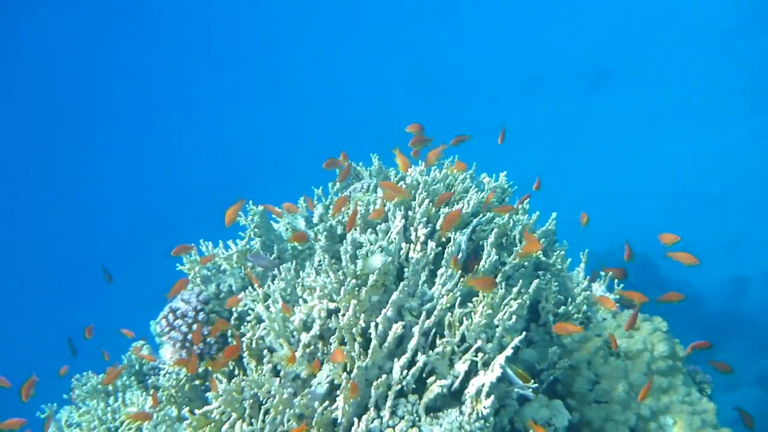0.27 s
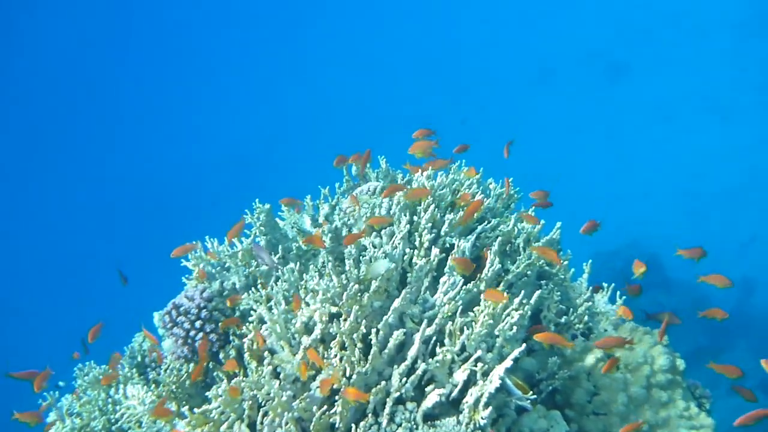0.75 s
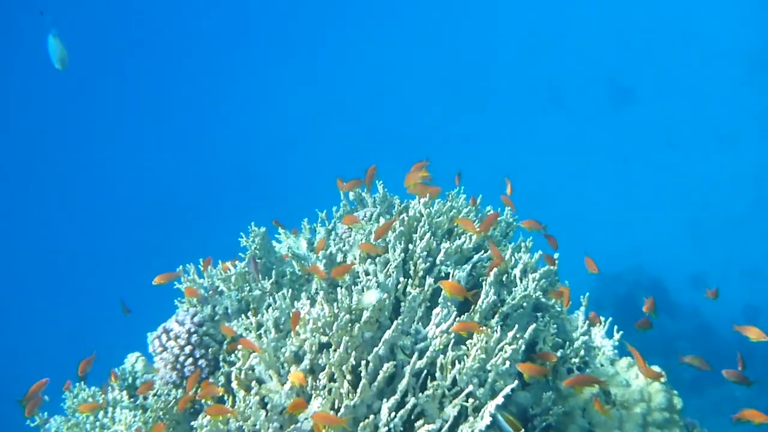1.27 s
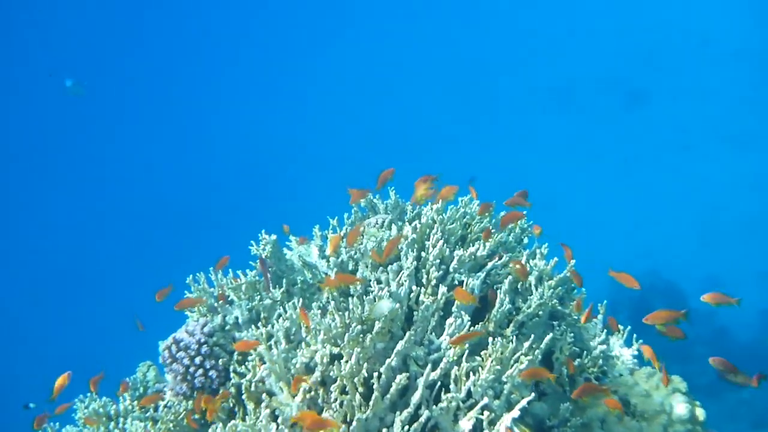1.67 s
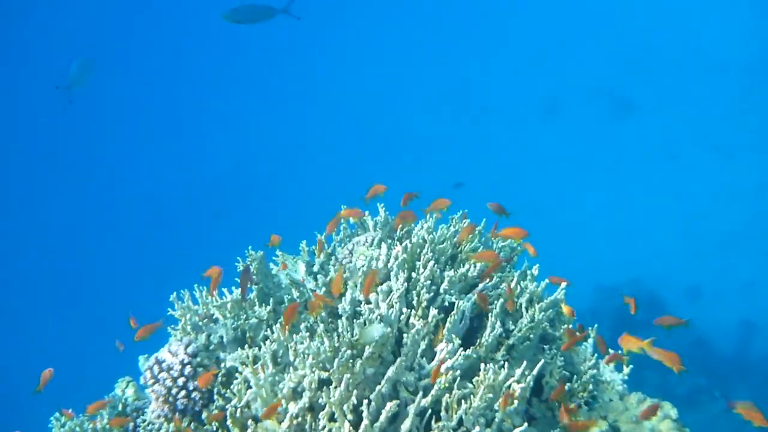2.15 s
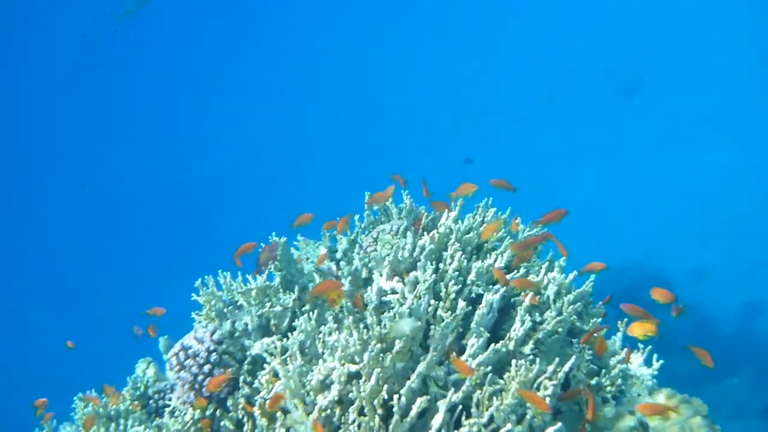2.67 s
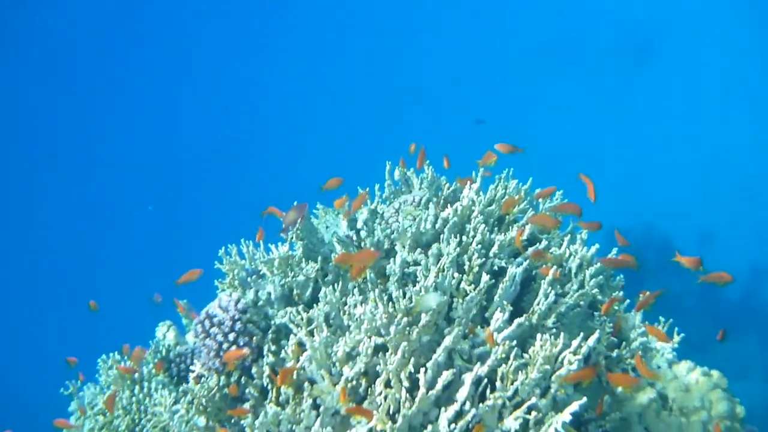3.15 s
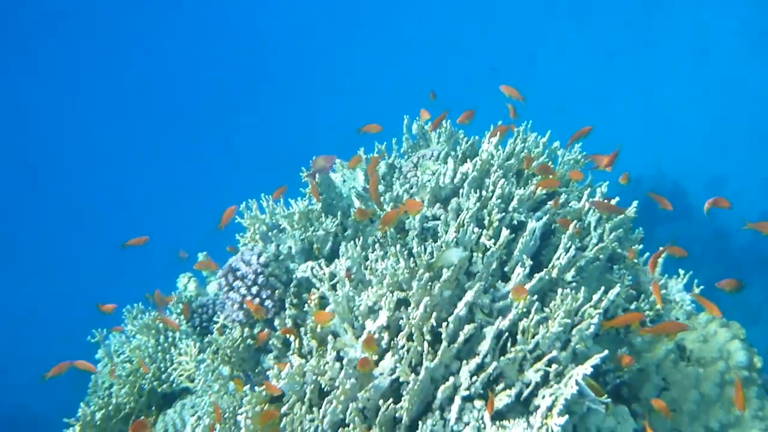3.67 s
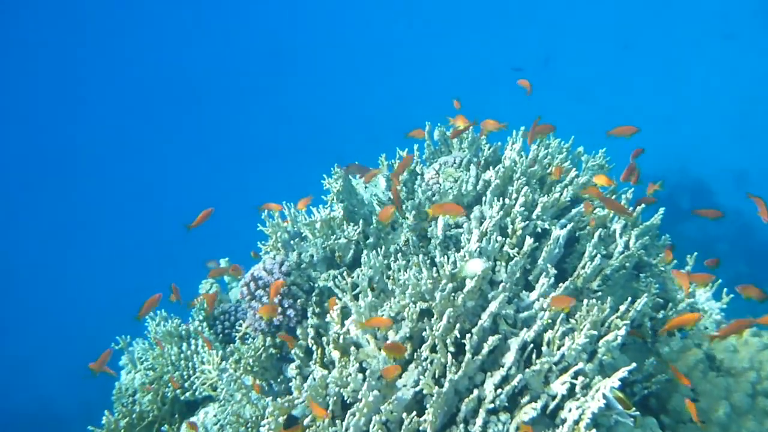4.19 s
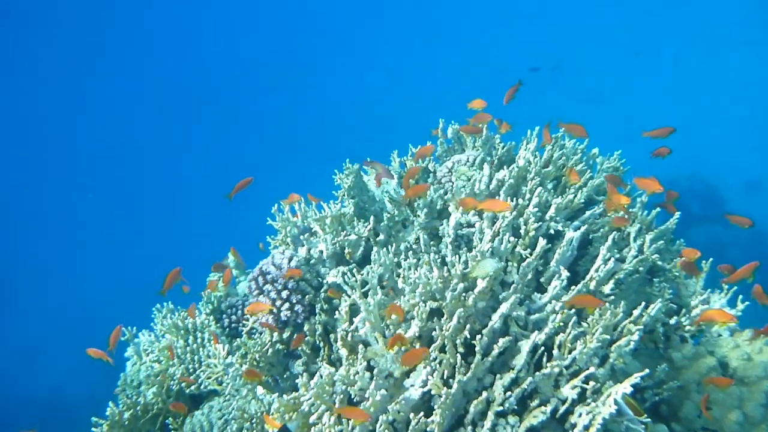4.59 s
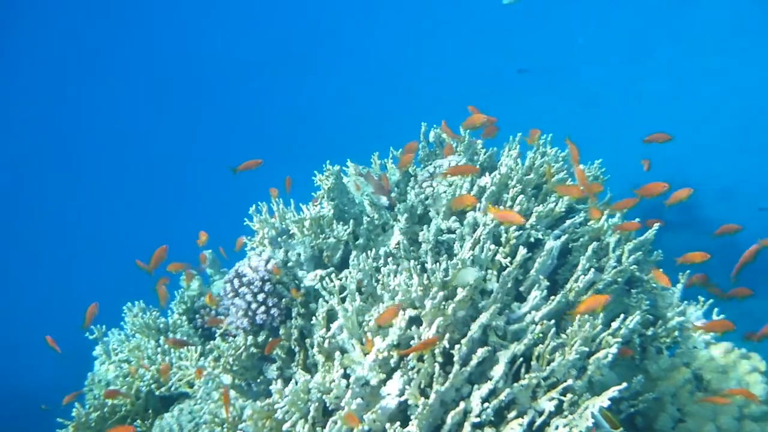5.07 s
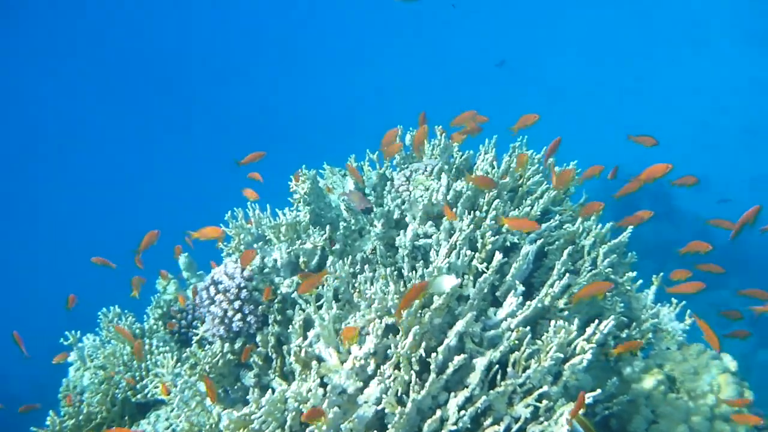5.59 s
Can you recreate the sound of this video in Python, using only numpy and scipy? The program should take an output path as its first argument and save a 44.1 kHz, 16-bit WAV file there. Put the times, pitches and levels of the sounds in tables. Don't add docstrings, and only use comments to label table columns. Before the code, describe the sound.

Underwater reef ambience: a fine frying crackle and soft hiss throughout, with random sharp pops at varying distances. Low fish knocks come in the first second and a half, then a heavy close snap, a slightly calmer stretch, another big snap, and denser popping with faint dull ringing later. The microphone sits in a camera housing whose walls ring briefly, colouring every click.

```python
import sys
import numpy as np
from scipy import signal
from scipy.io import wavfile
from scipy.ndimage import uniform_filter1d

SR = 44100
rng = np.random.default_rng(int(sys.argv[2]) if len(sys.argv) > 2 else 0)


def digitize_waveform(pressure):
    field = np.atleast_2d(pressure).T
    bounded = np.clip(field, -1, 1)
    quanta = np.round(bounded * 32767).astype(np.int16)
    wavfile.write(sys.argv[1], SR, quanta)


def linear_from_db(decibels):
    return 10 ** (np.asarray(decibels, float) / 20)


N = 257103

# frequency in Hz, width in Hz, level in dB.
PANELS = [(1602, 340, -0.5), (2030, 255, 0), (2530, 300, 0.5), (3230, 1340, -1.5), (4940, 2100, -12),
          (6900, 1230, -6.5), (9090, 2300, -13), (10500, 1400, -16), (14300, 2900, -39)]


def rms_one(x):
    return x / np.sqrt(np.mean(x ** 2) + 1e-20)


def in_time(rows):
    s, *columns = np.transpose(rows)
    return [np.interp(np.arange(N) / SR, s, column) for column in columns]


def drift(rate):
    knots = rng.standard_normal(int(N / SR * 60) + 2)
    return np.interp(np.arange(N) / SR * rate, np.arange(len(knots)), knots)


def butter(x, order, hz, kind):
    return signal.sosfilt(signal.butter(order, hz, kind, fs=SR, output="sos"), x)


def resonance(x, hz, width_hz):
    r = np.exp(-np.pi * width_hz / SR)
    feedback = [1, -2 * r * np.cos(2 * np.pi * hz / SR), r * r]
    return signal.lfilter([(1 - r * r) / 2, 0, (r * r - 1) / 2], feedback, x + 1e-18)


def double_resonance(x, hz, width_hz):
    return resonance(resonance(x, hz, width_hz), hz, width_hz)


def bursts(s, peak_db, hz, rise_s, phase, soft=4, size=900):
    rise_s, phase = rise_s + 0 * s, phase + 0 * s
    t = np.arange(size) / SR / rise_s[:, None]
    cycles = np.sin(2 * np.pi * (hz * rise_s)[:, None] * (t - 1) + phase[:, None])
    swell = (t * np.exp(1 - t)) ** soft
    start = np.maximum((s - rise_s) * SR, 0).astype(int)
    out = np.zeros(N + size)
    np.add.at(out, start[:, None] + np.arange(size), linear_from_db(peak_db)[:, None] * swell * cycles)
    return out[:N]


def water(patchy_db):
    # frequency in Hz, level in dB per Hz.
    spectrum = [(22, -16), (60, -6.5), (130, 1.5), (210, 3.5), (420, 1), (780, -2), (870, -6.5), (1300, -7),
                (2000, -7.5), (3500, -11), (4500, -14.5), (10500, -17.5), (12300, -25), (15500, -26.5)]
    hz_points, db_points = np.transpose(spectrum)
    edges = 22 * 2 ** np.arange(0, 9.7, 1 / 3)
    white = rng.standard_normal((2, N))
    out = 0
    for k, (low, high) in enumerate(zip(edges, edges[1:])):
        band = butter(white[k % 2], 2, [low, high], "band")
        level_db = np.interp(np.log(low * high) / 2, np.log(hz_points), db_points)
        out = out + linear_from_db(level_db + patchy_db * drift(14)) * band
    return rms_one(out)


def far_crackle():
    per_s, spread_db, loudest_db, panel_spread_db = 420, 4.5, 14, 5.5
    born = rng.random(N) < per_s * linear_from_db(4.5 * drift(9)) / SR
    size_db = np.minimum(spread_db * rng.exponential(1, N), loudest_db)
    spikes = born * linear_from_db(size_db) * rng.choice([-1, 1], N)
    out = 0
    for k, (hz, width_hz, level_db) in enumerate(PANELS):
        struck = spikes * linear_from_db(panel_spread_db * rng.standard_normal(N))
        out = out + (-1) ** k * linear_from_db(level_db) * double_resonance(struck, hz, 0.81 * width_hz)
    return rms_one(out)


def fish_knocks():
    # second of the peak, peak in dB, frequency in Hz, cycles of swell.
    knocks = [
        (0.618, -32, 111, 0.84),
        (.708, -28, 636, 2.6),
        (1.127, -18.5, 197, 0.8),
        (1.229, -25, 133, 0.87),
        (1.347, -27.5, 170, 1.2),
        (3.547, -33.5, 203, 1.7),
        (4.951, -38, 190, 1.2),
    ]
    s, peak_db, hz, cycles = np.transpose(knocks)
    return bursts(s, peak_db, hz, cycles / hz, 0.5, size=2400)


def housing_pushes():
    # second of the peak, peak in dB, frequency in Hz, cycles of swell.
    pushes = [
        (1.7828, -14, 410, 1.47),
        (1.7817, -1, 1330, 0.63),
        (3.013, -6, 1020, 0.69),
    ]
    s, peak_db, hz, cycles = np.transpose(pushes)
    return bursts(s, peak_db, hz, cycles / hz, 0.5, size=2400)


def singing_panel():
    # second of the peak, peak in dB.
    dull_snaps = [(4.035, -29.5), (4.113, -21.5), (4.192, -21), (4.464, -31), (4.514, -25), (4.70, -40),
                  (4.751, -25), (4.832, -26), (5.073, -21), (5.259, -33), (5.31, -29.5), (5.392, -23),
                  (5.48, -33), (5.711, -21.5), (5.82, -30)]
    s, peak_db = np.transpose(dull_snaps)
    out = 0
    for late, apart in zip(*rng.random((2, 3, len(s)))):
        arrival_s = s + 0.00706 * late - 0.003
        out = out + bursts(arrival_s, peak_db - 4.5, 1570 + 75 * apart, 0.0019, 0, soft=0.86)
    return out


def chance(count):
    low, bright, aim, other = rng.standard_normal((count, 4)).T
    return 2250 + 200 * low, 5270 + 550 * bright, 4 * aim, 4 * other


def small_snaps():
    # second of the peak, bright panel level in dB.
    small = [(.0548, -24), (.3031, -22.5), (.3664, -27), (.626, -27), (.754, -20), (.956, -31),
             (1.207, -24.5), (1.2755, -31), (1.5853, -26), (1.7362, -27), (1.8996, -34), (2.7116, -28),
             (2.7264, -30), (2.833, -32), (3.1393, -29), (3.3226, -23), (3.3464, -26), (3.443, -20),
             (3.639, -23), (3.6934, -25), (3.8195, -21.5), (4.0867, -24), (4.1217, -21), (4.3223, -21),
             (4.9703, -21), (5.0203, -23), (5.2595, -24), (5.2694, -30), (5.4263, -24.5), (5.656, -21.5)]
    count = 90
    faint = np.transpose([rng.random(count) * N / SR, -31.5 + 3 * rng.standard_normal(count)])
    s, bright = np.concatenate([small, faint]).T
    low_hz, bright_hz, aim, other = chance(len(s))
    return s, low_hz, bright - 9 + aim, bright - 6 + other, 1.15 * bright_hz, bright


def shaded_snaps():
    # second of the peak, low panel frequency in Hz, low panel level in dB.
    shaded = [(.022, 1720, -21.5), (0.1702, 2210, -19), (.1826, 2210, -20), (.41, 1980, .5),
              (.822, 1950, -1.5), (0.9827, 2020, -18), (1.0781, 2300, -22), (1.165, 2320, -23),
              (1.3374, 2250, -19.5), (1.4593, 1900, -22), (1.6054, 2400, -20.5), (2.1749, 2270, -21),
              (2.7688, 2270, -19.5), (2.944, 2230, -13.5), (3.0467, 2400, -23), (3.289, 2560, -20.5),
              (3.3657, 2150, -14), (3.435, 2140, -7.5), (3.801, 1790, -20.5), (3.8649, 2280, -8.5),
              (3.8754, 2030, -8.5), (3.9979, 1820, -16), (4.1447, 1940, -1.5), (4.1757, 2130, -21),
              (4.2082, 1760, -4), (4.34, 2050, -13), (4.825, 2250, -20), (5.185, 2580, -14),
              (5.478, 2300, -22), (5.768, 2030, -20)]
    s, low_hz, low = np.transpose(shaded)
    _, bright_hz, aim, other = chance(len(s))
    leak = 0.12 * low
    return s, low_hz, low, -24.5 + leak + aim, bright_hz, -27 + leak + other


def sideways_snaps():
    # second of the peak, middle panel level in dB, low panel level in dB.
    sideways = [(.005, -26, -22), (0.039, -17, -32), (.269, -17, -26), (0.4475, -20, -23),
                (.5429, -22.5, -31), (0.8667, -28, -33), (0.974, -21, -25), (1.0956, -17, -28),
                (1.3033, -24, -35), (1.378, -22.5, -23), (1.6623, -24, -30), (1.762, -23, -24),
                (1.972, -24, -30), (1.997, -24, -30), (2.1472, -20.5, -31), (2.2663, -21.5, -24),
                (2.4395, -19.5, -25), (2.4935, -23, -23.5), (3.1101, -21, -22), (3.2793, -22, -31),
                (3.4249, -22, -20), (3.481, -21, -24), (3.6147, -22, -24), (4.0239, -21, -20),
                (4.443, -22.5, -30), (4.668, -20, -24), (4.859, -18.5, -20), (5.0962, -27, -18),
                (5.2163, -21.5, -28), (5.2236, -18.5, -23)]
    s, middle, low = np.transpose(sideways)
    low_hz, bright_hz, aim, _ = chance(len(s))
    return s, low_hz, low, middle, bright_hz, middle - 6.5 + aim


def facing_snaps():
    # second of the peak, bright panel frequency in Hz, its level in dB, lower panels' level in dB.
    facing = [(.0096, 6800, -20.5, -22), (0.0908, 5550, -20, -26), (0.1031, 6300, -19, -27),
              (0.3805, 6500, -4.5, -15.5), (.634, 5460, -20, -25.5), (0.9305, 7700, -11.5, -17),
              (1.388, 6300, -17, -25), (1.5753, 6740, -18.5, -30), (1.622, 6700, -19.5, -31),
              (1.9097, 6160, -4, -17), (2.3952, 7100, -16.5, -25), (2.418, 4770, -21, -33),
              (2.554, 6900, -20, -23.5), (2.5665, 10000, -15, -17), (3.0084, 7160, -11.5, -25),
              (3.333, 7400, -10.5, -30), (3.5012, 6530, -19, -29), (3.6798, 6220, -20, -25.5),
              (3.9238, 6050, -9.5, -17), (4.0801, 6740, -17.5, -29), (4.0938, 4850, -16.5, -26),
              (4.113, 6560, -21, -25), (4.609, 6100, -20.5, -22), (4.893, 5500, -21, -21.5),
              (4.9816, 7350, -19, -22), (5.004, 6500, -19, -25), (5.387, 7800, -19.5, -31),
              (5.5962, 7400, -19.5, -23), (5.6039, 6700, -20.5, -22.5), (5.684, 6700, -16.5, -23.5)]
    s, bright_hz, bright, lower = np.transpose(facing)
    low_hz, _, aim, _ = chance(len(s))
    return s, low_hz, lower + aim / 2, lower - aim / 2, bright_hz, bright


def close_snaps():
    # second of the peak, low panel frequency in Hz, then low, middle and bright panel level in dB.
    close = [(0.2306, 2230, -17, -11, -15), (0.3747, 1900, -15, -18, -14.5),
             (.6003, 1750, -12.5, -9, -13.5), (.737, 2300, -9, -17, -34), (.7484, 1800, -8, -19, -33),
             (0.8921, 1780, -17.5, -13.5, -11), (0.9391, 2390, 0, -10, -12),
             (0.9963, 2230, -12.5, -21.5, -37), (1.1443, 2300, -17, -13.5, -18),
             (1.466, 2420, -9.5, -9, -34), (1.4895, 1770, -9.5, -17, -28), (1.693, 2180, -11, -14.5, -31),
             (1.7527, 2140, -11.5, -13.5, -34), (1.782, 1608, 6.5, -3, -2.5),
             (2.372, 1900, -12.5, -8.5, -7.5), (2.382, 2210, -5.5, -5.5, -17),
             (2.9164, 2260, -15, -15.5, -22), (3.013, 2340, 4.5, -5.5, -11.5),
             (3.4599, 2470, -8.5, -12, -13.5), (4.2156, 2435, -2, -1.5, -12.5),
             (4.4797, 2420, -21.5, -13.5, -14), (4.9882, 2020, -1, -12, -13), (5.0902, 2420, -8, -6, -20),
             (5.7893, 2140, -18, -15.5, -40)]
    s, low_hz, low, middle, bright = np.transpose(close)
    bright_hz = 5270 + 71 * (low - middle + chance(len(s))[2])
    return s, low_hz, low, middle, bright_hz, bright


def scatter(s, level_db, panels, t60):
    starts = np.zeros(N)
    np.add.at(starts, (s * SR).astype(int), linear_from_db(2 * level_db))
    power = signal.lfilter([1], [1, -linear_from_db(-120 / (t60 * SR))], starts + 1e-18)
    lumps = (0.4 + 0.6 * np.abs(rng.standard_normal(N // 64 + 1))).repeat(64)[:N]
    echoes = np.sqrt(power) * rng.standard_normal(N) * lumps
    out = 0
    for hz, width_hz, _ in panels:
        even_power = np.sqrt(SR / width_hz / 2 / len(panels))
        out = out + double_resonance(echoes, hz, 2 * width_hz) * even_power
    return out


def near_snaps():
    groups = [close_snaps(), shaded_snaps(), sideways_snaps(), facing_snaps(), small_snaps()]
    s, low_hz, low, middle, bright_hz, bright = np.concatenate(groups, axis=1)
    luck = rng.random((10, len(s)))
    turn = 2 * np.pi * luck[:5]
    out = bursts(s, low + 0.55, low_hz, 1.39 / low_hz, turn[0], soft=3.05)
    echo_s = s + 0.001804 + 0.001 * luck[6]
    out += bursts(echo_s, low - 13, 0.91 * low_hz, 1.56 / low_hz, turn[1], soft=1.7)
    middle_hz, middle_rise_s = 3430 + 350 * (luck[5] - 0.5), 0.00036 + 0.00025 * luck[6]
    out += bursts(s, middle + 0.56, middle_hz, middle_rise_s, turn[1], soft=1.3)
    out += bursts(s, middle - 9, 4100 + 500 * luck[7], 0.00025, turn[4], soft=3.0)
    out += bursts(s, bright - 1.5, bright_hz, 2.4 / bright_hz, turn[2], soft=3.24)
    out += bursts(s, bright - 11 + 8 * (luck[7] - 0.5), 6800 + 4000 * luck[8], 0.0003, turn[3])
    out += bursts(s, bright - 28, 12800 + 2400 * luck[9], 0.00025, turn[4])
    out += scatter(s + 0.0008, low - 22, PANELS[:3], t60=0.029)
    out += scatter(s + 0.0008, middle - 22, PANELS[3:4], t60=0.029)
    out += scatter(s + 0.00037, bright - 22, PANELS[4:8], t60=0.025)
    return butter(out + singing_panel(), 4, 1444, "high")


def scene():
    # second, water level in dB, far crackle level in dB.
    bed = [
        (0.0, -42.5, -44.5),
        (2.13, -45, -47.5),
        (5.26, -44, -45),
        (5.83, -41.5, -45),
    ]
    water_db, crackle_db = in_time(bed)
    mono = linear_from_db(water_db + 2.5) * water(patchy_db=1.9)
    mono = mono + linear_from_db(crackle_db + 3.0) * far_crackle()
    mono = mono + fish_knocks() + housing_pushes() + near_snaps()
    return np.array([mono, mono])


def gain_control(x):
    start_db, share, return_db_per_s, lag_s = -10, 0.87, 40, 0.026
    ramp = return_db_per_s * np.arange(N) / SR
    level_db = 10 * np.log10(uniform_filter1d(x[0] ** 2, size=128) + 1e-12)
    wanted_db = share * np.maximum(level_db - start_db, 0)
    held_db = np.maximum.accumulate(wanted_db + ramp) - ramp
    lag = np.exp(-1 / (lag_s * SR))
    return x * linear_from_db(-signal.lfilter([1 - lag], [1, -lag], held_db))


def overload(x, top=1.0):
    cut = np.clip(x, -top, top) - x
    return np.clip(x + butter(cut, 2, 150, "high"), -top, top)


def drop_faint_treble(x):
    hz, frames, z = signal.stft(x, SR, "hann", 2048)
    faint = np.median(np.abs(z[0][(hz > 12500) & (hz < 15000)]))
    threshold_db = -0.5 + 4 * rng.standard_normal((65, len(frames)))
    threshold = faint * linear_from_db(threshold_db).repeat(16, axis=0)[:len(hz)]
    keep = (np.abs(z) > threshold) | (hz < 3000)[:, None]
    return signal.istft(z * keep, SR, "hann", 2048)[1][:, :N]


def split_hiss():
    # second of the middle, side level in dB.
    splits = [(0.38, -47), (0.976, -47), (1.128, -54), (1.383, -54), (1.533, -55), (4.434, -51),
              (4.603, -50), (4.99, -42.5), (5.31, -55)]
    faint = [(s, -58.5) for s in rng.random(14) * N / SR]
    t = np.arange(N) / SR
    gate = 0
    for s, level_db in [*splits, *faint]:
        gate = gate + linear_from_db(level_db) * np.clip(1.3 - np.abs(t - s) / 0.013, 0, 1)
    hiss = butter(rng.standard_normal(N), 2, [120, 9000], "band")
    return gate * rms_one(signal.lfilter([1], [1, -0.6], hiss)) * [[1], [-1]]


def roll_off(x):
    return signal.sosfilt(signal.butter(12, 16450, fs=SR, output="sos"), x)


def record(dry):
    # frequency in Hz, width in Hz.
    notches = [(2900, 125), (7850, 120), (11760, 2160)]
    x = dry
    for hz, width_hz in notches:
        x = signal.lfilter(*signal.iirnotch(hz, hz / width_hz, fs=SR), x)
    x = signal.sosfilt(signal.cheby2(10, 26, 16000, fs=SR, output="sos"), x)
    x = drop_faint_treble(overload(gain_control(x)))
    return roll_off(x + split_hiss())


dry = scene()
out = record(dry)
digitize_waveform(out)
```